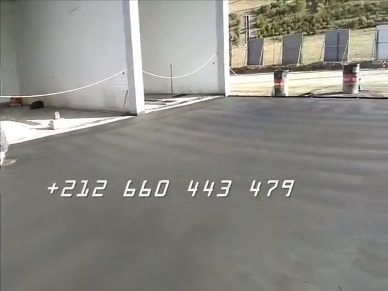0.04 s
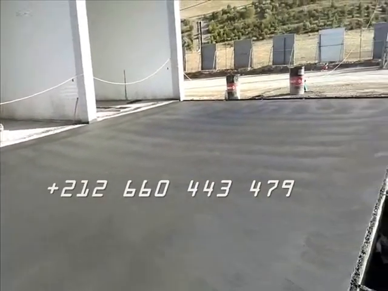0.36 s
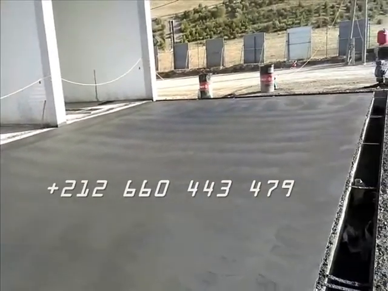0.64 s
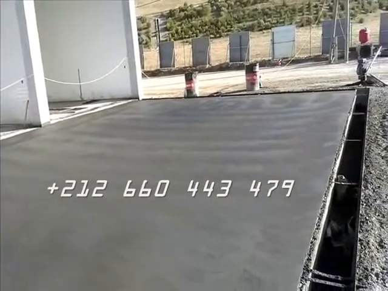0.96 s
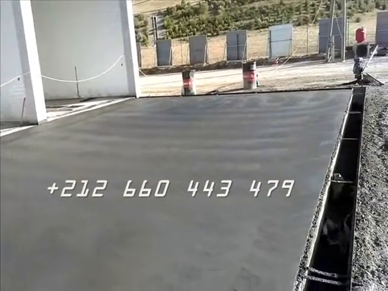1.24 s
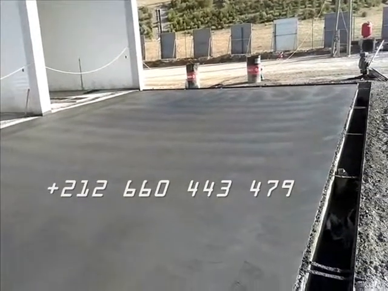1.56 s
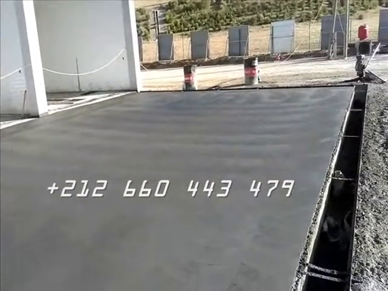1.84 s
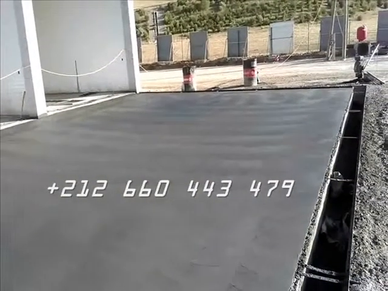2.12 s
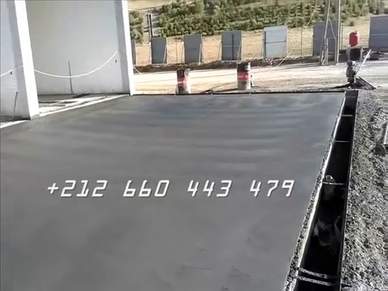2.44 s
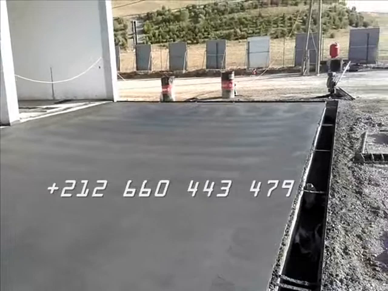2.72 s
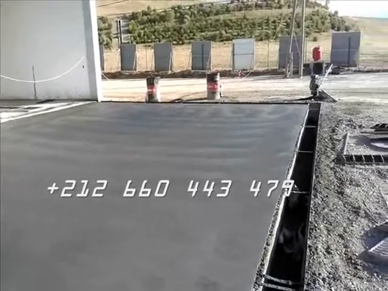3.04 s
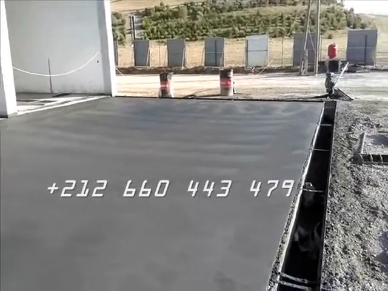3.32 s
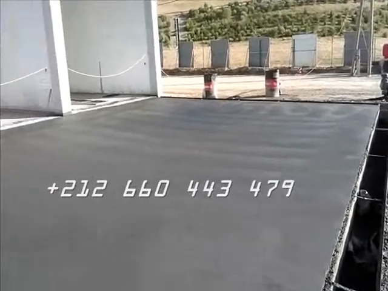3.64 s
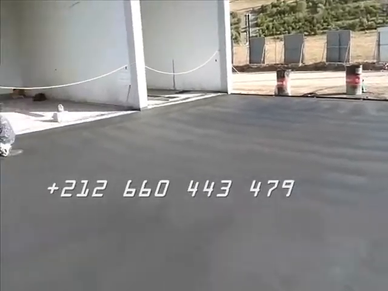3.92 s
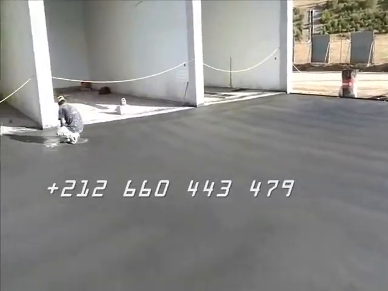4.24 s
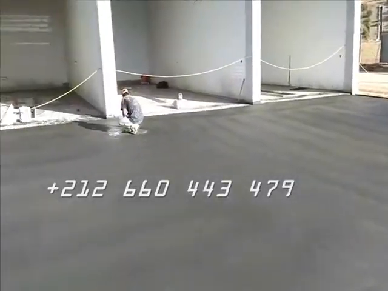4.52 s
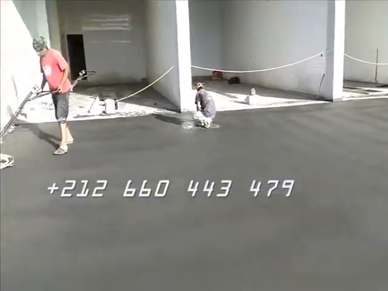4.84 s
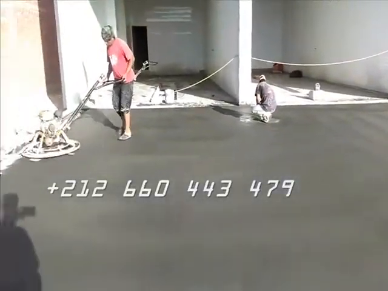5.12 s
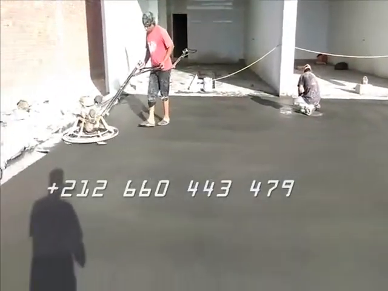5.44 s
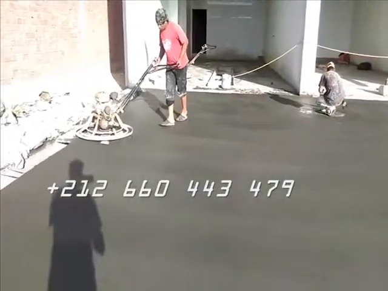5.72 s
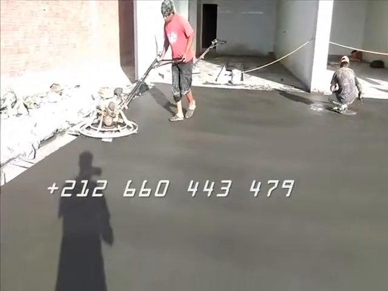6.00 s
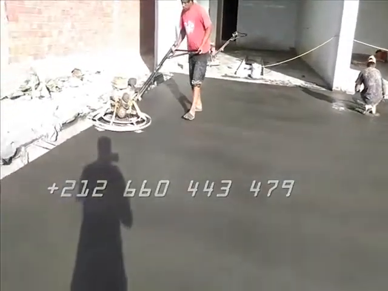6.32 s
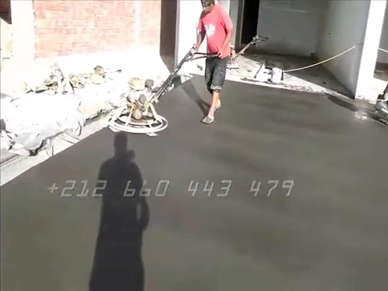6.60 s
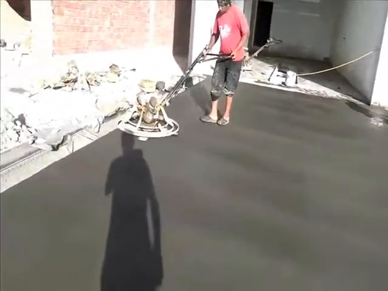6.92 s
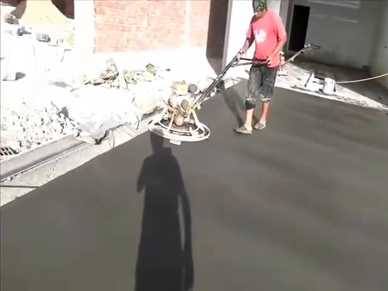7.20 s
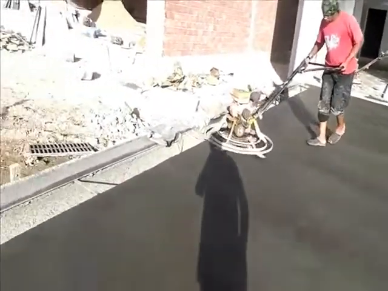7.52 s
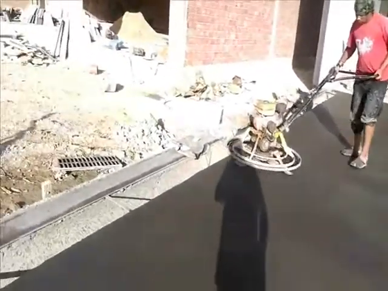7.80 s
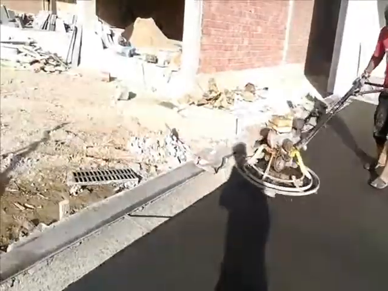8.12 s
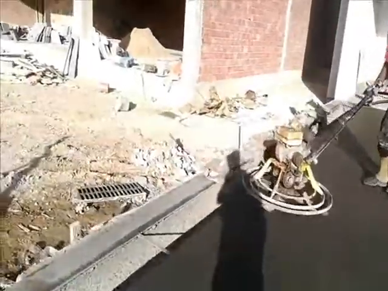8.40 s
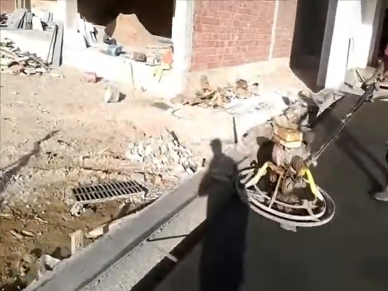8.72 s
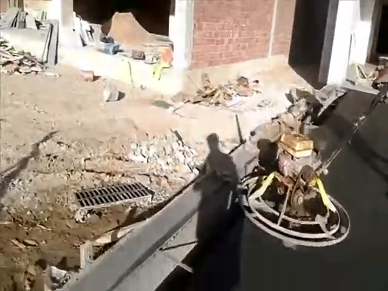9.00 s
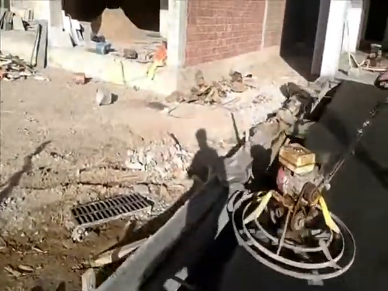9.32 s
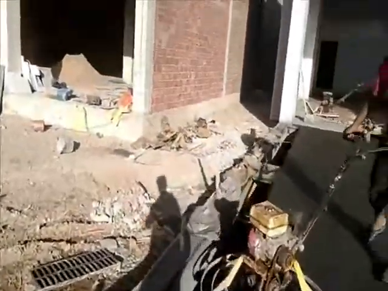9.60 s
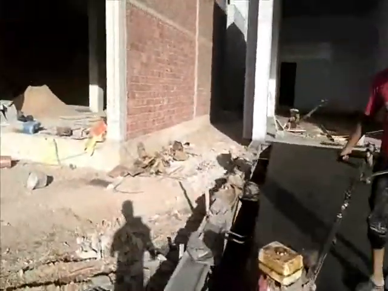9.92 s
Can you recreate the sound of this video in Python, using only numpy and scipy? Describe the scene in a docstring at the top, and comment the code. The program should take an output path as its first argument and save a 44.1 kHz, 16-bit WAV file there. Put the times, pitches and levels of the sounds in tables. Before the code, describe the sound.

A power trowel's small engine runs steadily at an outdoor building site, a rapid puttering drone with metallic clatter and the hiss of blades scraping concrete. It starts some way off to the left, with occasional stone ticks and faint wind on the microphone. Halfway, a dull thud falls as the machine moves to the centre and its blades ring faintly. The engine sags briefly, recovers, and ends close, louder and knocking.

```python
"""A walk-behind power trowel smooths a concrete slab beside a building, in a light breeze.
At first it is 8 m off to the left: each cycle of its one-cylinder four-stroke gives an exhaust beat, a
rasp of gas, an intake gulp and valve clatter, while walls echo, blades scrape and stones tick.
From 4 s the microphones turn to face it; a thud falls at 5 s, and the blades ring more strongly.
Near 7.4 s the engine sags under load, then overshoots; the machine ends close by, its piston knocking."""
import sys
import numpy as np
from scipy import signal
from scipy.fft import rfft, irfft, next_fast_len
from scipy.io import wavfile
from scipy.ndimage import uniform_filter1d

SR = 44100
rng = np.random.default_rng(int(sys.argv[2]) if len(sys.argv) > 2 else 0)


def waveform_to_disk(signal):
    """Save audio, clipped to [-1, 1], as 16-bit WAV at the path in sys.argv[1]."""
    frames = np.transpose(np.atleast_2d(signal))
    scaled = np.clip(frames, -1, 1) * 32767
    samples = np.round(scaled).astype(np.int16)
    wavfile.write(sys.argv[1], SR, samples)


N = 438794
T = np.arange(N) / SR

# governed firing rate, with one sag under load: t/s, f/Hz
FIRING_RATE = [(0.0, 27.21), (0.95, 27.53), (3.07, 27.32), (3.59, 27.58), (5.26, 26.66), (6.12, 26.78),
               (6.99, 25.99), (7.44, 24.41), (8.45, 28.51), (8.6, 27.5), (9.95, 28.02)]
# reflection from a surface near the microphones: t/s, lag/ms
REFLECTION_LAG = [(0, 1.43), (.7, 1.245), (3.55, 1.12), (4.85, 1.74), (6.6, 1.783), (8.2, 1.12),
                  (9.95, 0.84)]


def undb(db):
    """Amplitude ratio of a level in decibels."""
    return 10 ** (np.asarray(db) / 20)


def unit(x):
    """Normalisation to rms 1."""
    return x / np.sqrt(np.mean(x ** 2))


def curves(rows):
    """Linear interpolation of a table's columns in time."""
    times, *columns = np.transpose(rows)
    return [np.interp(T, times, column) for column in columns]


def spell(start, end):
    """Trapezoidal time window with 0.25 s edges."""
    return np.clip(np.minimum(T - start, end - T) / .25 + .5, 0, 1)


def wander(rate_hz):
    """Smooth random modulation with a spread near 1."""
    size = int(SR / rate_hz)
    steps = np.repeat(rng.standard_normal(N // size + 1), size)
    return np.sqrt(3 / 2) * uniform_filter1d(steps, size)[:N]


def colour(x, spectrum):
    """Zero-phase filtering by a spectrum of f/Hz, level/dB points."""
    hz, db = np.transpose(spectrum)
    size = next_fast_len(N + 8192, real=True)
    f = np.maximum(np.fft.rfftfreq(size, 1 / SR), 1)
    gain = undb(np.interp(np.log(f), np.log(hz), db))
    return irfft(rfft(np.float32(x), size) * np.float32(gain), size)[..., :N]


def ring(x, hz, width_hz):
    """Second-order resonance, gain 1 at its centre."""
    return signal.lfilter(*signal.iirpeak(hz, hz / width_hz, fs=SR), x)


def delay(x, ms):
    """Propagation delay, fixed or varying."""
    return np.interp(T - ms / 1000, T, x)


def strokes(cycle, scatter_db):
    """Impulse train: one pulse of uneven strength per cycle."""
    at = np.flatnonzero(np.diff(np.floor(cycle)) > 0)
    pulses = np.zeros(N)
    pulses[at] = undb(scatter_db * rng.standard_normal(len(at)))
    return pulses


def fade(pulses, decay_s):
    """Damping: each pulse decays exponentially."""
    return signal.lfilter([1], [1, -np.exp(-1 / (decay_s * SR))], pulses)


def rattle(cycle, power, repeat, grain_db):
    """Cyclostationary noise: dense impacts on three paths; the share `repeat` recurs each cycle."""
    size = int(SR / FIRING_RATE[0][1])
    position = (cycle % 1 * size).astype(int) % size
    first, second = rng.standard_normal((2, 3, size))[:, :, position]
    drift = 2 * np.pi * T / 7
    locked = first * np.cos(drift) + second * np.sin(drift)
    loose = rng.standard_normal((3, N))
    envelope = np.sqrt(power) * undb(grain_db * wander(450))
    return (np.sqrt(repeat) * locked + np.sqrt(1 - repeat) * loose) * envelope


def directivity(x, side, front, facing):
    """Directivity: the spectrum passes from side to front as the microphones face the machine."""
    return unit(colour(x, side)) * (1 - facing) + unit(colour(x, front)) * facing


def hollow(x, depth=.4, width_hz=104):
    """Destructive interference: the near reflection cuts a band that rises as its lag shortens."""
    lag_s = curves(REFLECTION_LAG)[0] / 1000
    hz = np.minimum(.717 / lag_s, 450)
    phasor = np.exp(2j * np.pi * np.cumsum(hz) / SR)
    pole = np.exp(-np.pi * width_hz / SR)
    band = 2 * np.real(phasor * signal.lfilter([1 - pole], [1, -pole], x / phasor))
    return x - depth * band


def stereo(paths, lead_ms, pan_db, diffuse_db, bounce_db):
    """Time and level differences place a direct path amid two diffuse ones; a reflection combs all."""
    direct = np.array([delay(paths[0], -lead_ms / 2), delay(paths[0], lead_ms / 2)])
    pair = direct + undb(diffuse_db) * paths[1:]
    lag_ms, = curves(REFLECTION_LAG)
    pair = np.array([channel + undb(bounce_db) * delay(channel, lag_ms) for channel in pair])
    pair = pair * undb(np.array([pan_db, -pan_db]) / 2)
    return pair / pair.mean(0).std()


def breeze():
    """Turbulence at the microphones: a low rumble that swells in puffs."""
    # puffs of wind: t/s, half-width/s, level/dB
    gusts = [(0.794, 0.21, -44), (1.798, 0.26, -46), (2.24, 0.18, -40), (4.773, 0.035, -29)]
    calm = undb(-52 + 3 * wander(3))
    force = calm + sum(undb(db) * np.exp(-((T - s) / width) ** 2) for s, width, db in gusts)
    air = rng.standard_normal(N) + 2.1 * rng.standard_normal((2, N))
    spectrum = [(15, -34), (40, -23), (70, 14), (110, 10), (200, -36), (500, -18), (2000, -79)]
    return force * unit(colour(air, spectrum))


def bump(at_s=5, peak_db=-21, hz=137, width_hz=92):
    """Impulse response of a low, damped resonance: one dull thud."""
    push = np.zeros(N)
    push[int(at_s * SR)] = -1
    thud = ring(ring(push, hz, width_hz), hz, 3 * width_hz)
    return undb(peak_db) * thud / np.abs(thud).max()


def grit():
    """Impact excitation: now and then a stone ticks against a blade."""
    # stone strikes: t/s, peak level/dB, f/Hz, nominal bandwidth/Hz, decay/s
    strikes = [(0.678, -21, 1410, 200, 0.0023), (1.002, -25, 1660, 160, .007),
               (1.2, -31, 1670, 160, 0.0062), (1.464, -21.5, 1700, 200, 0.0051),
               (1.678, -26, 1610, 130, 0.01), (1.711, -19, 4300, 800, 0.0037),
               (1.893, -31, 1770, 252, .007), (3.025, -22, 1880, 170, .01), (3.355, -23, 1820, 200, .007),
               (4.746, -27, 1580, 200, .007), (4.748, -25, 3560, 500, .008), (4.77, -23, 1650, 400, 0.0065),
               (5.524, -18, 3320, 340, 0.0068), (5.672, -17.5, 1080, 300, 0.013),
               (7.07, -17.5, 2530, 500, 0.0028), (7.07, -17.5, 3630, 800, 0.003),
               (7.269, -18, 805, 250, 0.0045), (7.278, -19, 2680, 500, 0.0059),
               (7.507, -21, 840, 200, 0.0039), (7.596, -18.5, 1380, 300, .007),
               (8.692, -18, 2800, 400, .004)]
    out = np.zeros((2, N))
    t = T[:SR // 8]
    for s, db, hz, width_hz, decay_s in strikes:
        burst = rng.standard_normal((2, len(t))) * np.exp(-t / decay_s)
        tick = ring(ring(burst, hz, 1.5 * width_hz), hz, 1.5 * width_hz)
        start = int(s * SR)
        out[:, start:start + len(t)] += undb(db) * tick / np.abs(tick).max()
    return out


def blade_ring(lead_ms, hz=2195, width_hz=55):
    """Friction on the concrete keeps one narrow mode of the steel blades ringing."""
    # strength of the ring: t/s, level/dB
    level = [(0, -60), (4.6, -58), (5.2, -47), (6.3, -44), (6.9, -48), (8.3, -53), (9.3, -49), (9.95, -47)]
    mode = ring(ring(rng.standard_normal((3, N)), hz, width_hz), hz, 4 * width_hz)
    pair = stereo(mode, lead_ms, pan_db=np.full(N, 4.5), diffuse_db=-1.2, bounce_db=-23)
    return pair * undb(curves(level)[0])


def overtones(cycle):
    """Phase locking: high harmonics of the firing rate swell and fade as machine and listener move."""
    # harmonics clear of the rattle: start t/s, end t/s, harmonic number, level/dB
    harmonics = [(-0.3, 3.9, 13, -49), (-0.3, 3.7, 15, -50), (0.6, 4.0, 17, -53), (1.2, 3.4, 18, -54),
                 (2.0, 4.7, 31, -53.5), (4.0, 5.6, 21, -51.5), (4.4, 6.6, 25, -52), (4.9, 7.0, 18, -50),
                 (7.4, 8.2, 14, -45), (7.3, 8.1, 33, -45), (8.0, 9.4, 31, -44), (9.0, 10.2, 18, -45.5),
                 (9.1, 9.8, 25, -46), (9.4, 10.2, 14, -42)]
    out = np.zeros((2, N))
    air_phase = .2 * np.array([wander(5), wander(5)])
    crank_phase = 2 * np.pi * cycle + .016 * wander(12)
    for start, end, number, db in harmonics:
        window = spell(start, end)
        at = window > 0
        amplitude = np.sqrt(2) * undb(db + 2.2 * wander(8)[at]) * window[at]
        out[:, at] += amplitude * np.cos(number * crank_phase[at] + air_phase[:, at])
    return out


def piston_knock(cycle, lead_ms):
    """Impact excitation: two uneven piston knocks per cycle ring the crankcase."""
    # knocks: phase after the exhaust beat/cycles, relative level/dB
    knocks = [(0.935, -2), (0.245, -1.5)]
    # crankcase modes: f/Hz, bandwidth/Hz, relative level/dB
    modes = [(890, 104, -0.5), (1040, 130, -4)]
    # strength of the knocking: t/s, level/dB
    level = [(0, -44), (1, -64), (4, -56), (7.0, -46), (7.5, -40), (8.4, -37.5), (9.2, -37.5), (9.95, -40)]
    jittered = cycle + .002 * wander(60)
    hits = sum(undb(db) * strokes(jittered - phase, scatter_db=1.6) for phase, db in knocks)
    chatter = undb(-20) * np.sqrt(fade(hits ** 2, .0016)) * rng.standard_normal((3, N))
    chatter[0] += hits
    case = sum(undb(db) * ring(ring(chatter, hz, width), hz, 5 * width) for hz, width, db in modes)
    pair = stereo(case, lead_ms, pan_db=np.full(N, 2.5), diffuse_db=-2, bounce_db=-13)
    return pair * undb(curves(level)[0])


def valve_blows(cycle):
    """Decaying impact power that the valves feed to block, covers and hiss."""
    # blows: phase after the exhaust beat/cycles, decay/s, relative level/dB in block, covers, hiss
    blows = [(0.89, 0.004, -15, -1, -1), (0.0046, 0.0049, -18, 2, 2.5), (0.31, 0.0059, -7, 1, -12)]
    pulses = [fade(strokes(cycle - phase, scatter_db=2.2), decay_s) for phase, decay_s, *_ in blows]
    return undb(np.array(blows)[:, 2:].T) ** 2 @ np.array(pulses)


def scrape_hiss(cycle, blows, facing):
    """Friction noise of blades on uneven grit, with the valve blows on top."""
    # hiss from the side: f/Hz, relative level/dB
    side = [(2200, -53), (3500, -5.5), (4150, -1.5), (4800, 0.5), (6200, -11.5), (8000, -12.5),
            (9200, -10.5), (10500, -13), (12500, -16), (15500, -26)]
    # from the front: f/Hz, relative level/dB
    front = [(2200, -6), (3400, -2), (4100, -0.5), (5000, -1), (6200, -6.5), (8000, -8.5), (9200, -5.5),
             (10500, -9.5), (12500, -16.5), (15500, -19)]
    noise = rattle(cycle, 1.2 + blows, repeat=.014, grain_db=1.58) * undb(1.18 * wander(8.7))
    return directivity(noise, side, front, facing)


def cover_clatter(cycle, blows, facing):
    """Forced vibration: valve blows rattle the sheet-metal covers."""
    # covers from the side: f/Hz, relative level/dB
    side = [(900, -27), (1400, -1), (1700, -3.5), (2050, 0), (2450, -1.5), (2750, 0), (2950, 0),
            (3400, -8.5), (3900, -12), (7000, -70)]
    # from the front: f/Hz, relative level/dB
    front = [(900, -51), (1400, -1), (1700, 5), (1900, 6), (2250, 6.5), (2700, 5), (3200, -2), (3800, -6),
             (7000, -67)]
    return directivity(rattle(cycle, .93 + blows, repeat=.08, grain_db=1.7), side, front, facing)


def block_rattle(cycle, blows, facing):
    """Structure-borne sound: the cast block rattles and drives the guard ring's modes."""
    # block from the side: f/Hz, relative level/dB
    side = [(200, 3), (450, 6), (650, -5.5), (850, 1), (1100, 10), (1300, -1), (1550, -25), (2000, -34),
            (4000, -60)]
    # from the front: f/Hz, relative level/dB
    front = [(200, -8.5), (400, -1), (520, -6.5), (700, -2.5), (850, 0), (1100, -1.5), (1350, 0), (1470, 2),
             (1650, -17), (2000, -52), (4000, -63)]
    # guard ring modes: f/Hz, bandwidth/Hz, relative level/dB
    modes = [(374.5, 5.5, 0.5), (482, 24, -5.5), (587, 21, -4), (647, 9.9, -4), (860, 22, -6.5)]
    block = rattle(cycle, 1.2 + blows * facing, repeat=.12, grain_db=2.5)
    guard = sum(undb(db) * ring(block, hz, width) for hz, width, db in modes)
    radiation = signal.butter(2, 124, "high", fs=SR, output="sos")  # too small to radiate deep bass
    return hollow(directivity(signal.sosfilt(radiation, block + guard), side, front, facing))


def gas_rasp(cycle, off_beam_db=-14.5):
    """Jet noise: as the exhaust valve opens, a burst of gas rings the silencer's shell."""
    # shell modes, each beamed at the listener for a time:
    # f/Hz, bandwidth/Hz, relative level/dB, start t/s, end t/s
    modes = [(1690, 130, 2.5, 1.0, 3.8), (2230, 130, 8.5, 0.32, 0.72), (2516, 130, 6.5, 0.53, 1.82),
             (2640, 97, 9, 1.2, 1.5), (2850, 180, 8, -0.3, 0.61), (4070, 110, 1.5, 0.72, 3.9),
             (4630, 310, -2, 0.047, 0.67), (4230, 800, -18, -0.3, 3.8), (9450, 1100, -11.5, -0.3, 12)]
    puffs = strokes(cycle + .008, scatter_db=4)
    jet = np.sqrt(fade(puffs, .00088)) * rng.standard_normal((3, N))
    shell = sum(undb(db + off_beam_db * (1 - spell(start, end))) * ring(jet, hz, width)
                for hz, width, db, start, end in modes)
    return signal.sosfilt(signal.butter(2, [1400, 10500], "band", fs=SR, output="sos"), shell)


def machinery(cycle, nearness, facing, lead_ms):
    """Incoherent sources add in power: block, covers, hiss and gas, all louder as they near."""
    block_blows, cover_blows, hiss_blows = valve_blows(cycle)
    block = block_rattle(cycle, block_blows, facing)
    covers = cover_clatter(cycle, cover_blows, facing)
    hiss = scrape_hiss(cycle, hiss_blows, facing)
    pan_db = -.93 + 4 * facing
    block = stereo(block, lead_ms, .5 * pan_db, diffuse_db=-6, bounce_db=-18.5 + 10 * facing)
    covers = stereo(covers, lead_ms, 2.24 * pan_db, diffuse_db=1, bounce_db=-8.5)
    hiss = stereo(hiss, lead_ms, pan_db, diffuse_db=1.5, bounce_db=-21)
    gas = stereo(gas_rasp(cycle), lead_ms, 3.4 * pan_db, diffuse_db=-2, bounce_db=-11)
    block_gain = undb(-37.5 + 5.6 * nearness)
    cover_gain = undb(-37.5 + 5.4 * nearness)
    hiss_gain = undb(-42 + 10.34 * nearness - .76 * facing)
    gas_weight = .35 * (1 - facing) + .025 * facing
    gas_gain = np.sqrt(gas_weight) * undb(-3) * np.hypot(cover_gain, hiss_gain)
    treble = np.sqrt(1 - gas_weight) * (covers * cover_gain + hiss * hiss_gain)
    return block * block_gain + treble + gas * gas_gain


def frame_shake(cycle):
    """Rotating unbalance: the crank rocks the frame at two and three times the firing rate."""
    # frame vibration: t/s, relative level/dB of harmonic 2, of harmonic 3
    levels = [(0.0, -50, -36.5), (0.99, -51, -41), (3.24, -53, -33.5), (3.85, -60, -36), (5.3, -51, -40.5),
              (7.92, -52, -32.5), (8.12, -43, -41), (8.37, -54, -28.5), (9.95, -47, -38)]
    second_db, third_db = curves(levels)
    phase = 2 * np.pi * cycle
    second = undb(second_db + 7.5) * np.cos(2 * phase)
    third = undb(third_db - 4.5) * np.cos(3 * phase)
    return np.sqrt(2) * (second + third)


def standing_waves(x, cycle):
    """Standing waves between the walls swell or cancel single harmonics for a moving listener."""
    # nodes and antinodes passed: start t/s, end t/s, harmonic number, level change/dB
    passages = [(-0.3, 0.39, 6, 7), (0.1, 2.5, 8, -1.5), (0.2, 2.3, 4, 4), (0.6, 2.25, 5, 6),
                (2.35, 3.25, 4, -4), (2.35, 3.2, 5, -5), (2.45, 3.31, 7, 4), (2.45, 3.7, 3, 1),
                (3.25, 4.36, 5, 9.5), (4.4, 5.5, 5, 5.5), (3.35, 3.9, 8, -18), (3.75, 4.1, 3, -13),
                (3.75, 4.12, 7, 6.5), (3.75, 5.7, 6, -7), (3.85, 5.6, 8, 0.5), (3.4, 5.55, 4, 7),
                (4.55, 5.5, 7, 6), (4.55, 8.2, 9, 3), (5.05, 5.6, 3, -6), (5.5, 6.6, 6, 7),
                (6.15, 7.0, 3, 2.5), (6.15, 7.66, 7, 7.5), (7.8, 8.2, 7, 6.5), (6.3, 7.7, 8, 5.5),
                (7.1, 8.3, 3, -0.5), (7.15, 7.85, 4, 9.5), (7.3, 8.4, 11, 5), (7.7, 9.3, 6, 7.5),
                (8.25, 9.05, 7, 9.5), (9.3, 10.2, 7, 9.5), (9.5, 12, 6, 5.5)]
    out = x.copy()
    two_cycles = int(2 * SR / FIRING_RATE[0][1])
    for start, end, number, db in passages:
        window = spell(start, end)
        at = window > 0
        phasor = np.exp(2j * np.pi * number * cycle[at])
        harmonic = 2 * np.real(phasor * uniform_filter1d(x[at] / phasor, two_cycles))
        out[at] += (undb(db) - 1) * window[at] * harmonic
    return out


def exhaust(cycle, nearness, facing):
    """Pulsating flow: exhaust beat and intake suction, filtered by the silencer, echo off a wall."""
    # silencer from the side: f/Hz, relative level/dB
    side = [(50, -49), (85, -46), (110, -11), (140, -1), (220, 2.5), (290, 2), (420, -6), (520, -26.5),
            (900, -59), (2000, -80)]
    # from the front: f/Hz, relative level/dB
    front = [(50, -13.5), (85, -11.5), (110, 3.5), (140, 2), (190, 4.5), (220, 4), (245, 8), (280, 3.5),
             (330, -2), (420, -15), (560, -19), (850, -14), (2000, -92)]
    # echo from the building: t/s, lag/ms
    echo_lag = [(0, 21.5), (2.3, 23), (3.2, 27), (4.2, 22), (5.2, 21.7), (6.2, 25), (8.4, 21.8)]
    beat = strokes(cycle, scatter_db=.5)
    gulp = strokes(cycle - .225, scatter_db=.8) * undb(-9 - 3 * facing + 3.5 * nearness)
    flutter = undb(-41) * rng.standard_normal(N)
    pipe = hollow(directivity(beat - gulp + flutter, side, front, facing))
    pipe = pipe - 1.62 * ring(pipe, 341, 36)  # a chamber holds back part of each beat and rings on
    pipe = pipe + undb(-14.5) * facing * delay(pipe, curves(REFLECTION_LAG)[0])
    echo = undb(-11.5 - 8 * nearness) * delay(pipe, curves(echo_lag)[0])
    return unit(pipe + echo) * undb(-32.5 + nearness + 2.32 * facing)


def scene():
    """Superposition: one crank times the engine; bearing and distance set level, colour and stereo."""
    # the machine's path: t/s, bearing to the left/degrees, distance/m
    path = [(0, 61.5, 7.9), (1.3, 69.5, 7.6), (3.4, 70, 8.4), (4.2, 55.5, 8.35), (5.3, 23, 8.65),
            (7.1, -1, 8), (8.4, -15, 5.13), (9.2, -14, 4.38), (9.95, -2.5, 3.44)]
    cycle = .033 + np.cumsum(curves(FIRING_RATE)[0]) / SR
    cycle = cycle + .002 * wander(20)  # no two turns take quite the same time
    degrees, distance_m = curves(path)
    nearness = np.log2(8 / distance_m)  # halvings of distance from 8 m
    facing = np.clip(1.25 * np.cos(np.radians(degrees)), 0, 1)
    lead_ms = .49 * np.sin(np.radians(degrees))
    drone = standing_waves(exhaust(cycle, nearness, facing) + frame_shake(cycle), cycle)
    left = undb(-1.3) * delay(drone, -.35 * lead_ms)
    right = undb(-1.8) * delay(drone, .36 * lead_ms)
    side_wall = undb(-24) * delay(left, 13.9)
    engine = np.array([left + side_wall, right - side_wall])
    engine += machinery(cycle, nearness, facing, lead_ms)
    engine += piston_knock(cycle, lead_ms) + overtones(cycle)
    return engine + blade_ring(lead_ms) + grit() + bump() + breeze()


def record(dry, top_hz=15750):
    """Band limiting: a steep low-pass removes the highest treble."""
    return signal.sosfilt(signal.ellip(10, .2, 80, top_hz, fs=SR, output="sos"), dry)


dry = scene()
out = record(dry)
waveform_to_disk(out)
```